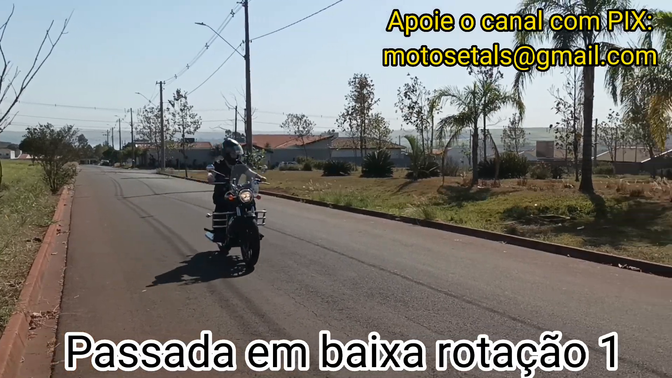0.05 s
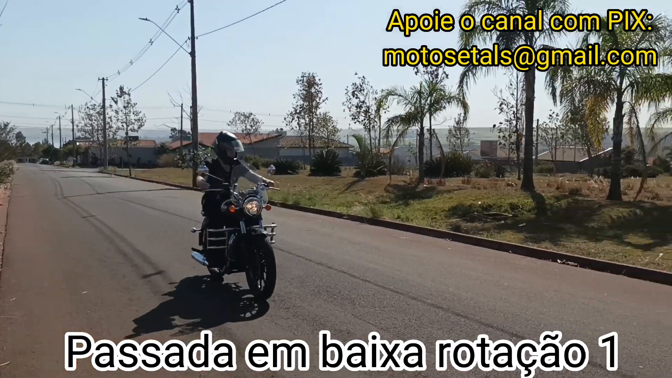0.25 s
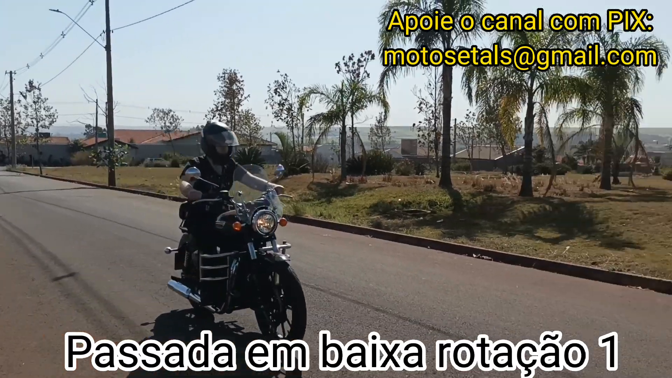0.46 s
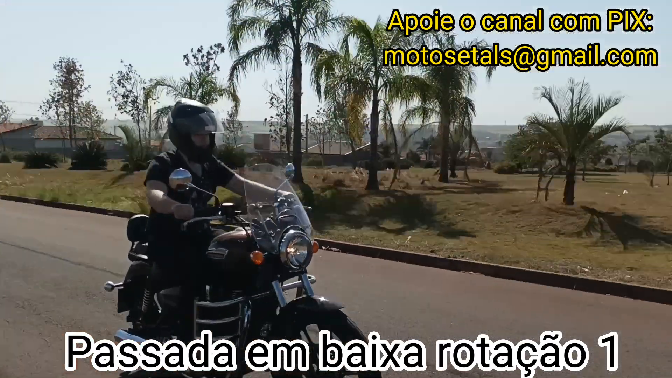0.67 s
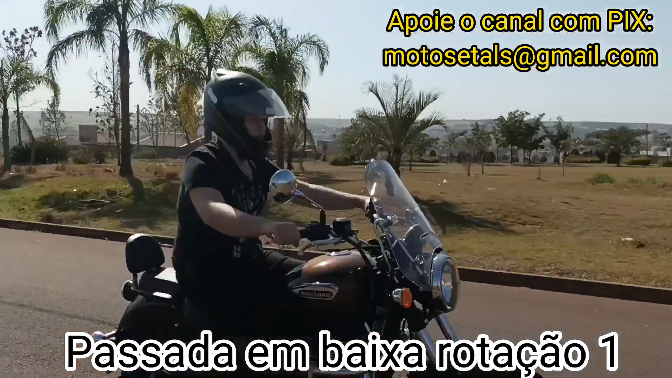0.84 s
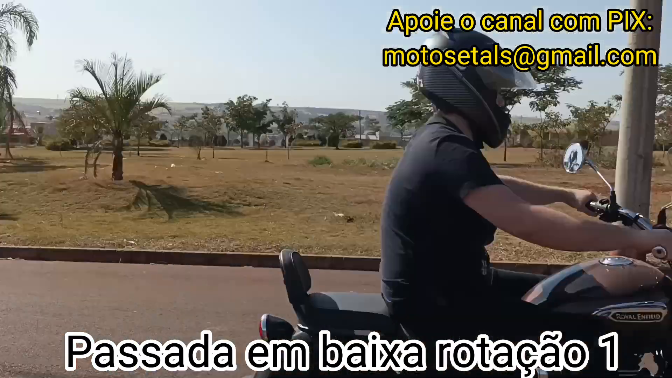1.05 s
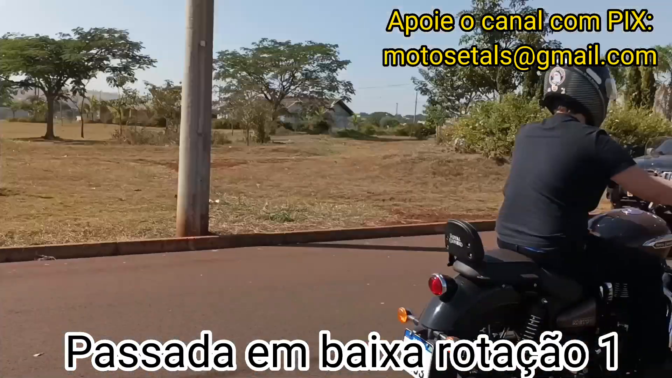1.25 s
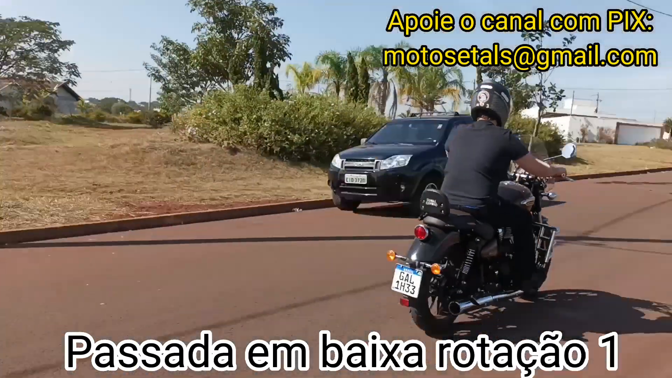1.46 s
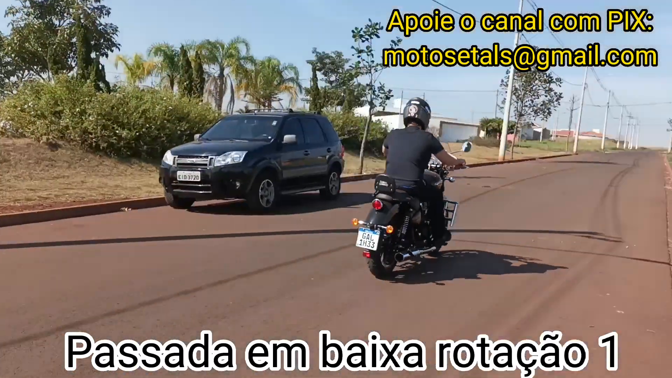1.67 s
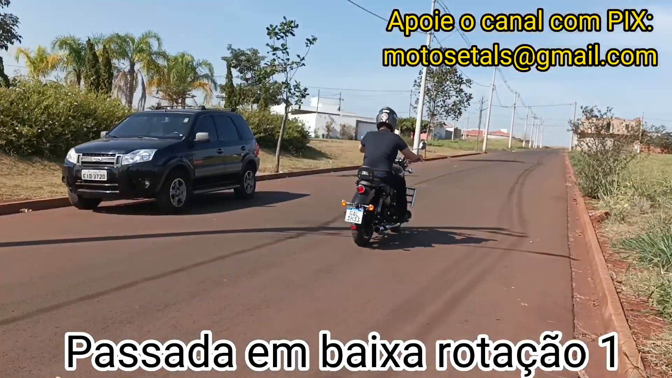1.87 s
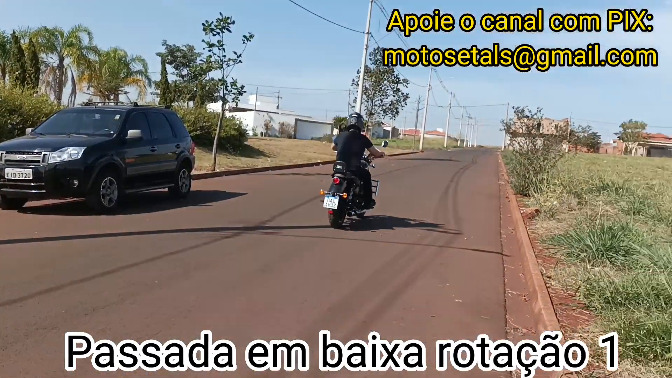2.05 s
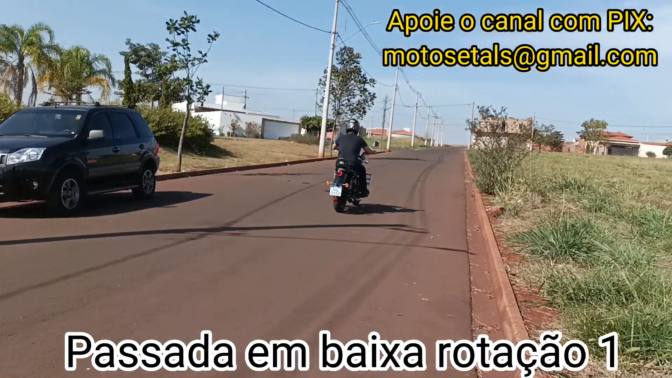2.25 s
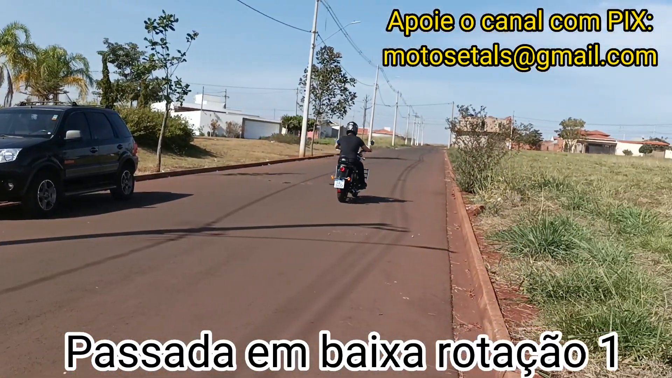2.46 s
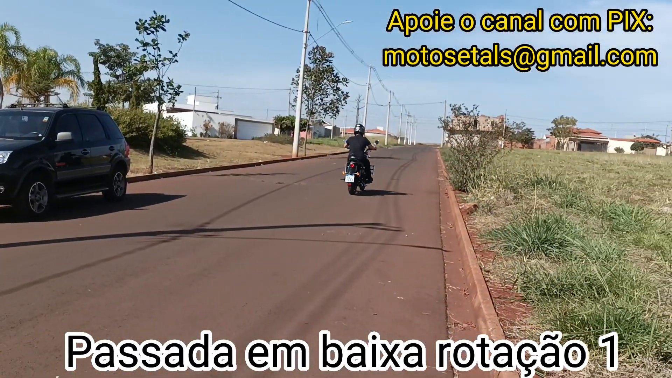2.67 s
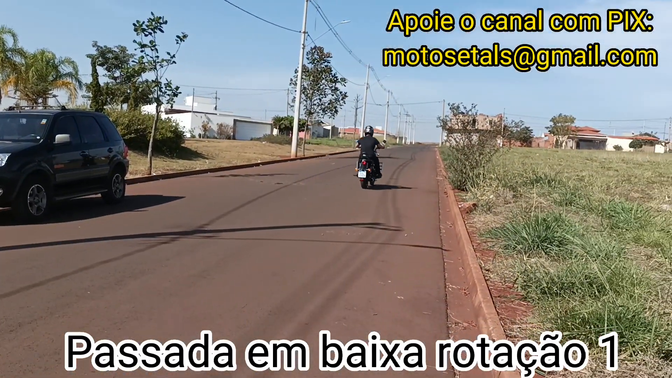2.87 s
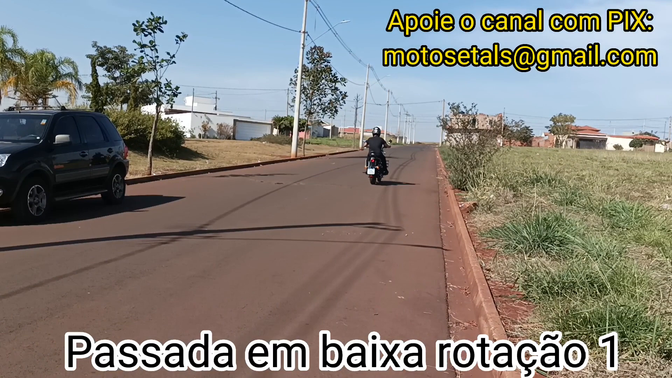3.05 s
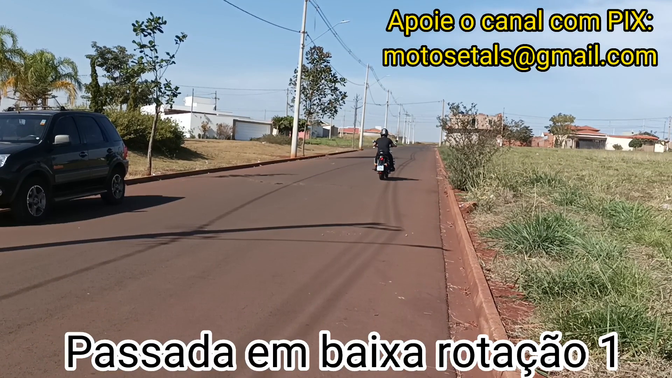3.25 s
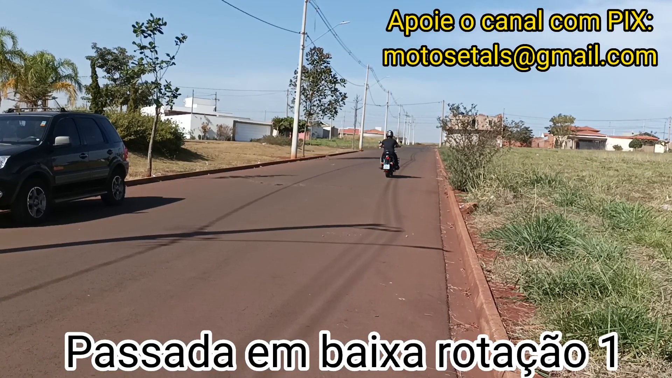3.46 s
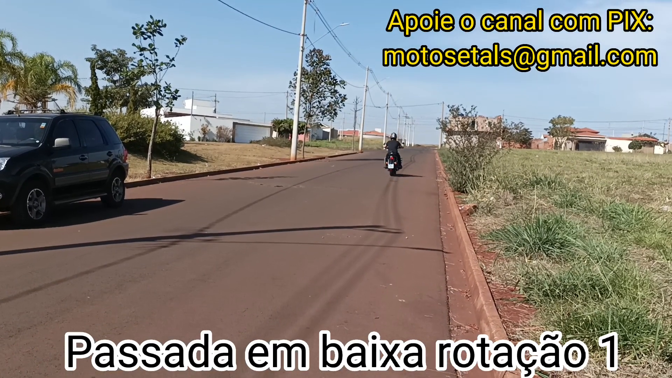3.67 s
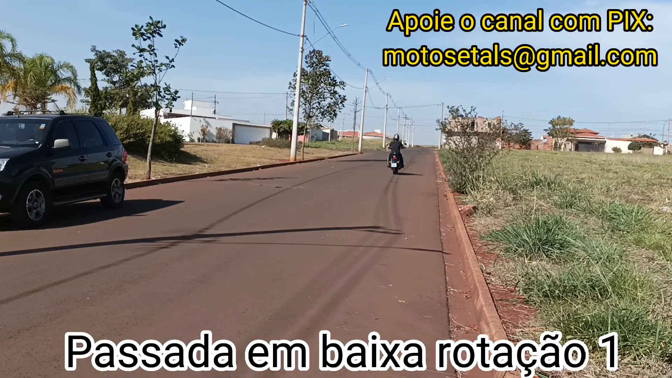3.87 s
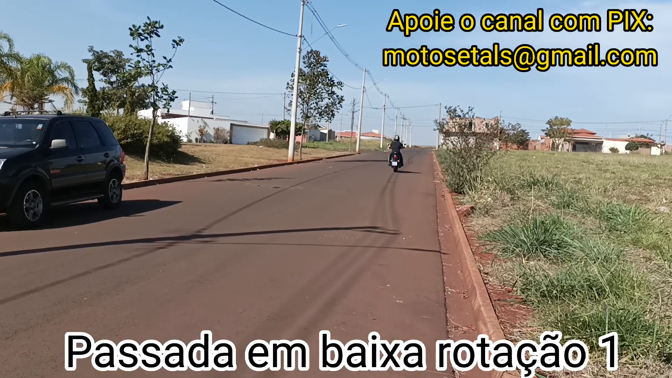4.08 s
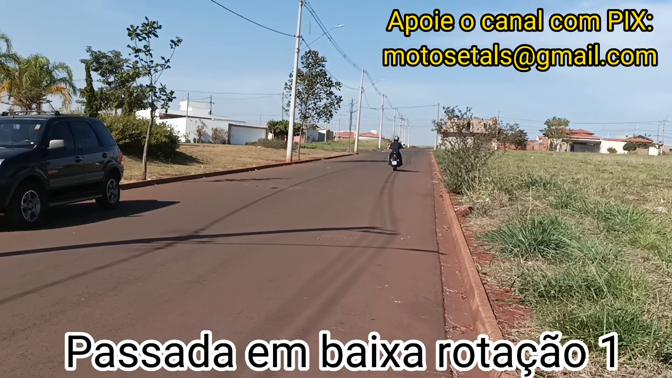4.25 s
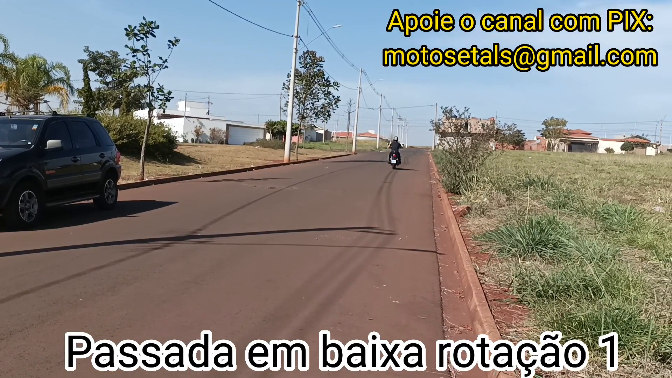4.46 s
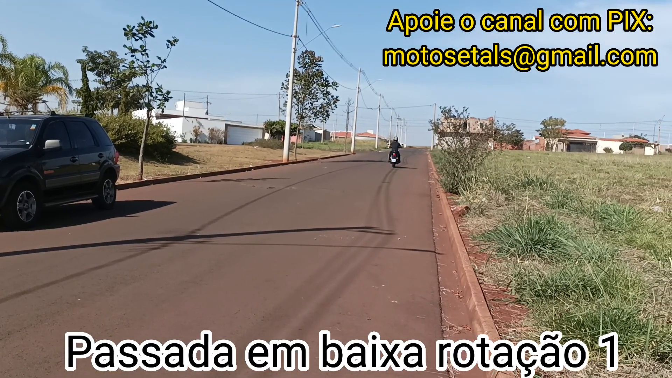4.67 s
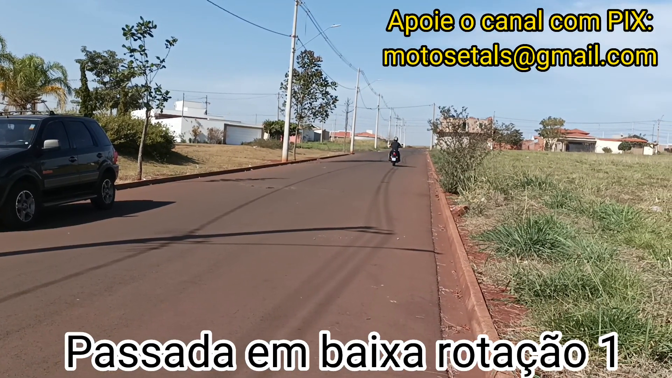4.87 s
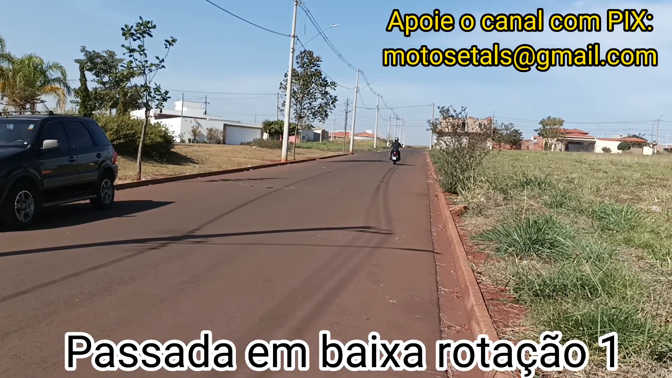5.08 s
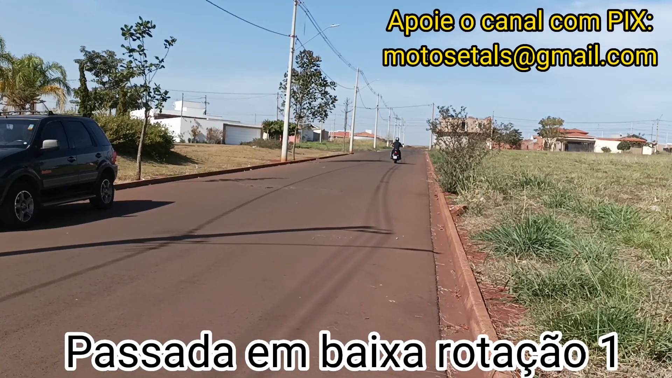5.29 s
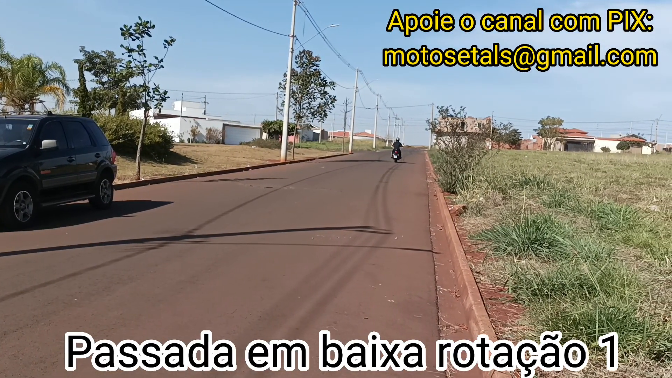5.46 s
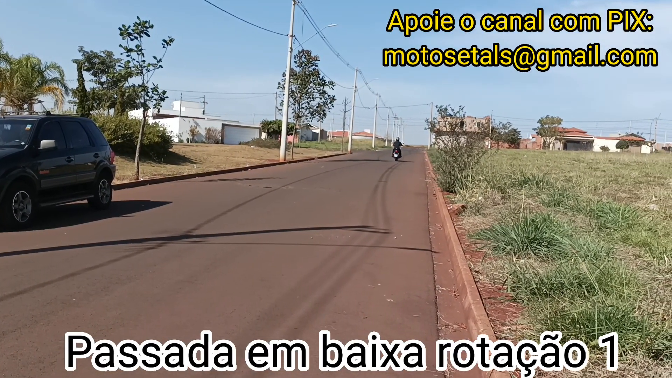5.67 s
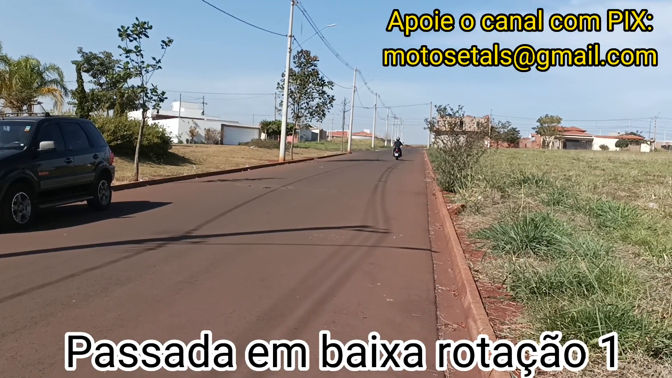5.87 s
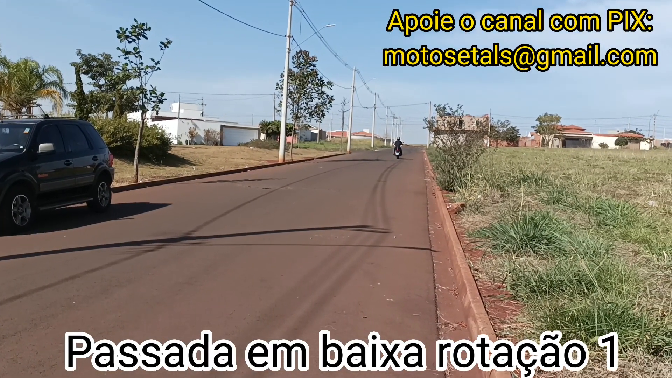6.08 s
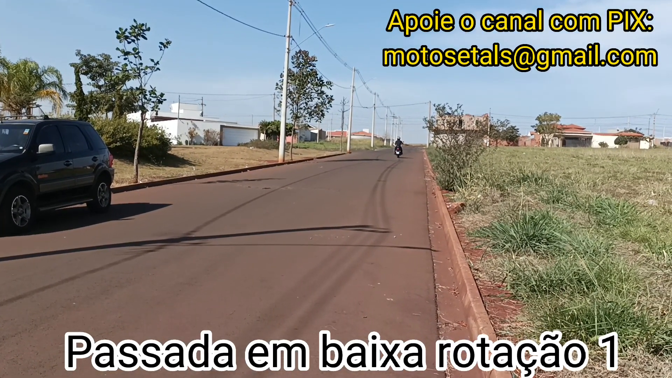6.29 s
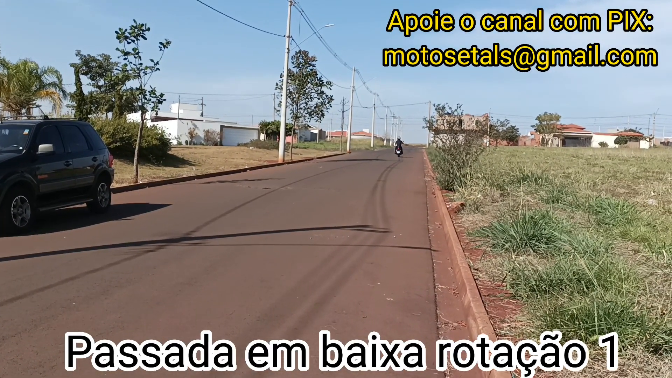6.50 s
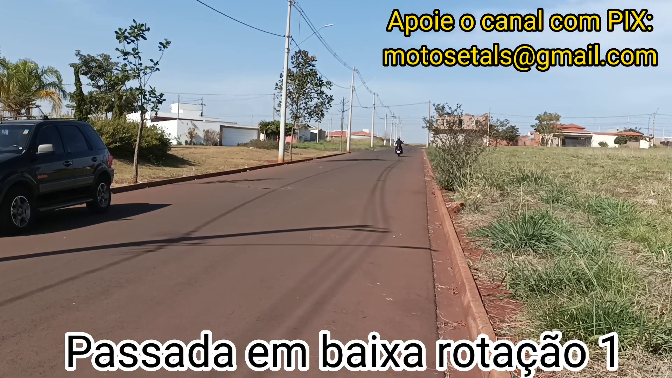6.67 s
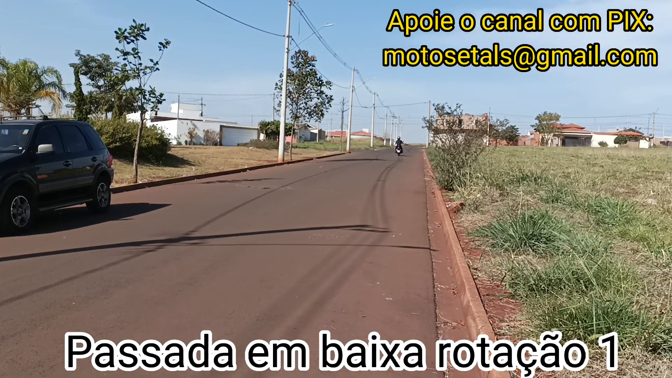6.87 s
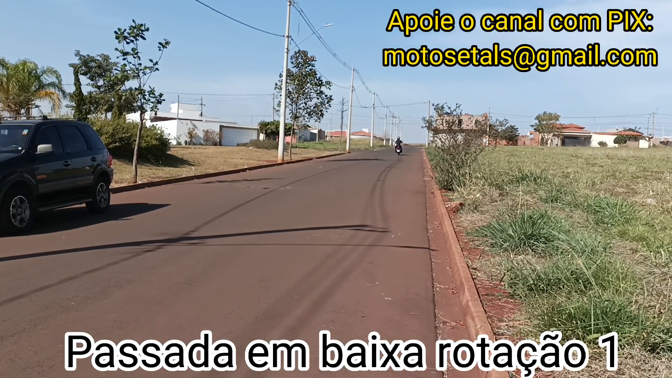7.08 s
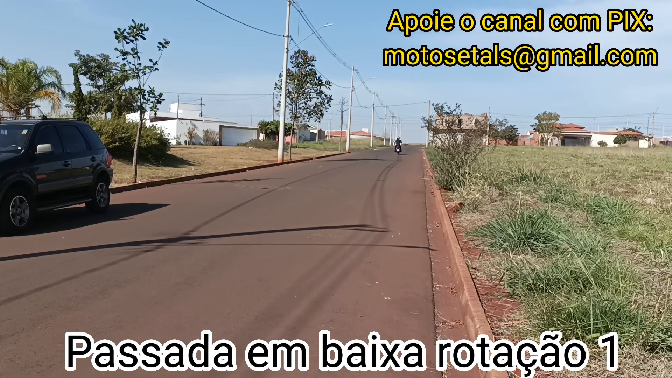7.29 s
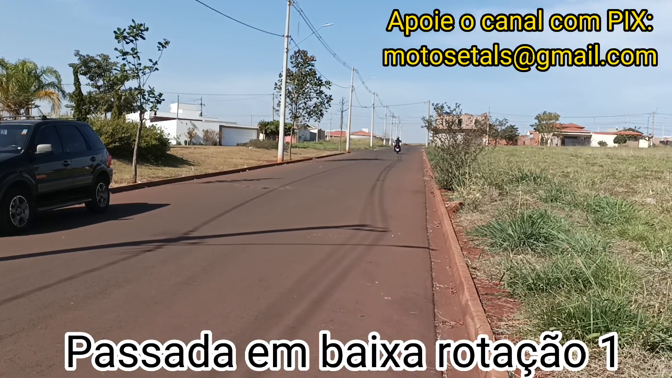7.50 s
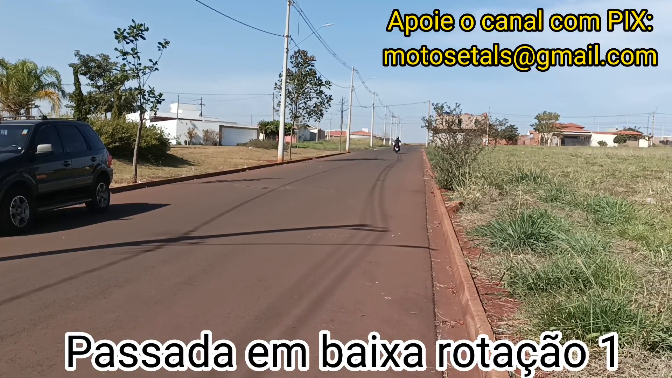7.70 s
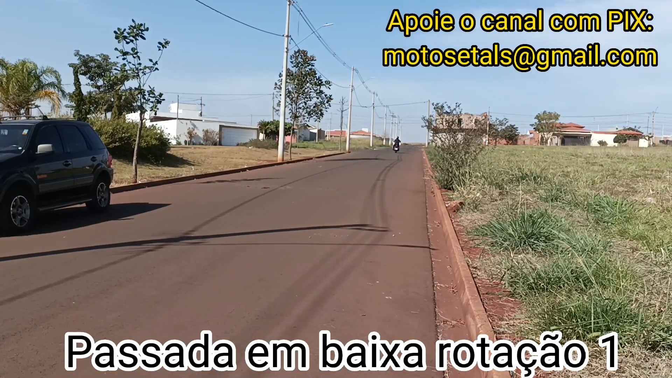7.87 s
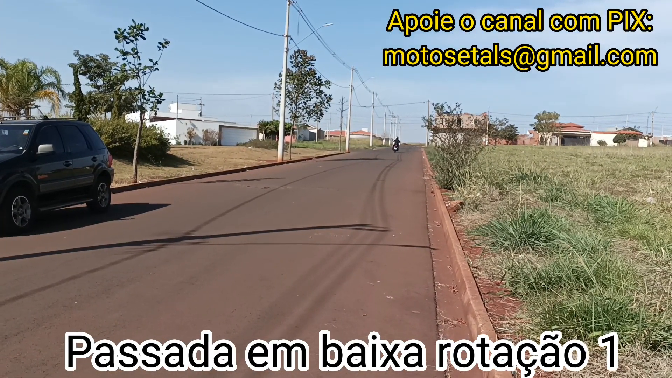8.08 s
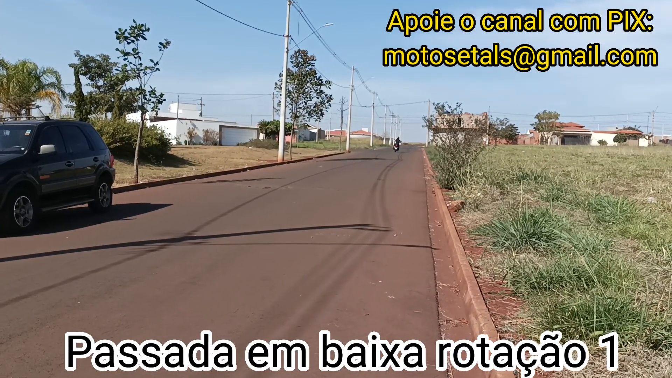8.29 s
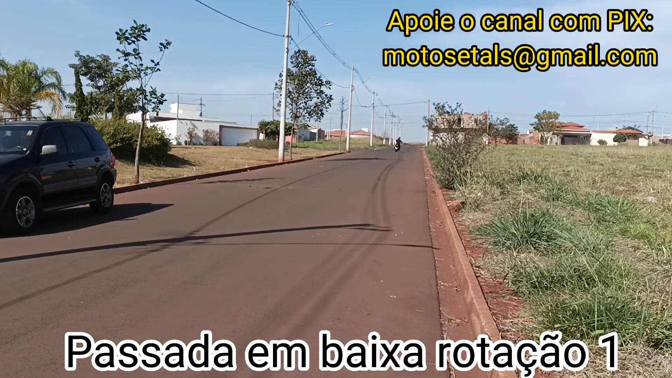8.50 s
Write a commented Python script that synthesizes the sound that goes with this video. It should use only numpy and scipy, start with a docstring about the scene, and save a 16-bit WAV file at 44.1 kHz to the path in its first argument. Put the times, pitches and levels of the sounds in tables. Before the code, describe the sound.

A motorcycle with a loud, barking exhaust cruises past, fades, falters briefly and chugs on into the distance, with faint chirps.

```python
"""A suburban street, a stereo microphone on the kerb. A big single-cylinder motorcycle comes up at low
revs, airbox honking, and passes close after a second, valve gear, chain and tyres rustling. Each firing
thumps the exhaust pipe with a bark and a spit of gas; a parked car and the house fronts throw it back.
From about three seconds small birds chirp now and then as the bike rides off. Near six seconds the
engine fades and falters, then returns abruptly and lugs on into the distance, slowing."""
import sys
import numpy as np
from scipy import signal
from scipy.fft import rfft, irfft, next_fast_len
from scipy.io import wavfile
from scipy.ndimage import map_coordinates

SR = 44100
rng = np.random.default_rng(int(sys.argv[2]) if len(sys.argv) > 2 else 0)


def dump_mix(stems):
    """Bounce the given channels to the path in sys.argv[1] as a 16-bit WAV at rate SR."""
    frames = np.atleast_2d(stems).T  # one column per channel
    limited = np.clip(frames, -1, 1)  # hard clip at full scale
    pcm = np.round(limited * 32767).astype(np.int16)
    wavfile.write(sys.argv[1], SR, pcm)


N = 376613
TIME = np.arange(N) / SR
ENGINE_PASS_S, PIPE_PASS_S = 1, 1.156  # engine, then pipe mouth, nearest the microphone
PASSING_S = 0.34  # time to ride a length equal to that nearest distance
FALTER_S, LUG_S = (5.63, 6.11), 6.28  # the engine falters, then returns lugging


def undb(db):
    """Decibels to gain."""
    return 10 ** (np.asarray(db) / 20)


def unit(x):
    """Scale to an rms of one."""
    return x / np.sqrt(np.mean(x ** 2))


def curves(table, at):
    """Every column of a table at the given times."""
    s, *columns = np.transpose(table)
    return [np.interp(at, s, c) for c in columns]


def gains(points, size):
    """A (freq_hz, level_db) spectrum as gains on the bins of an FFT."""
    hz, db = np.transpose(points)
    return undb(np.interp(np.log(np.fft.rfftfreq(size, 1 / SR) + 1), np.log(hz), db))


def colour(x, points):
    """Filter by a spectrum, without delay."""
    size = next_fast_len(N)
    return irfft(rfft(x, size) * gains(points, size), size)[..., :N]


def ring(x, points, size=8192):
    """Send x through a causal resonator of this colour and unit energy."""
    cepstrum = irfft(np.log(gains(points, size)))
    cepstrum[1:size // 2] *= 2
    cepstrum[size // 2 + 1:] = 0
    response = irfft(np.exp(rfft(cepstrum)))
    return signal.oaconvolve(x, response / np.linalg.norm(response))[:N]


def boost(x, at, hz, db, width):
    """A moving peak (or dip) of relative width, applied to short overlapping frames."""
    f, s, frames = signal.stft(x, SR, nperseg=2048, noverlap=1536)
    centre, gain = np.interp(s, at, hz), undb(np.interp(s, at, db) / 2)
    u = 1j * f[:, None] / centre
    frames = frames * (1 + u * width * gain + u ** 2) / (1 + u * width / gain + u ** 2)
    return signal.istft(frames, SR, nperseg=2048, noverlap=1536)[1][..., :N]


def walk(rate_hz):
    """Smooth random drift with a spread near one."""
    knots = rng.standard_normal(N // 100)
    return np.interp(TIME * rate_hz, np.arange(len(knots)), knots)


def distance(at, closest_s):
    """Distance from the microphone on a straight ride, in multiples of the nearest distance."""
    return np.hypot(1, (at - closest_s) / PASSING_S)


def pulses(times, db):
    """One impulse per firing, sized so that the train has this rms level."""
    train = np.zeros(N)
    samples = np.clip((times * SR).astype(int), 0, N - 1)
    train[samples] = undb(db) * np.sqrt(SR / curves(FIRING_RATE, times)[0])
    return train


def even_noise(count, size):
    """Rows of noise with equal strength at every frequency, repeating every few milliseconds."""
    cycle = irfft(np.exp(2j * np.pi * rng.random((count, 183))))
    return unit(cycle[:, np.arange(size) % cycle.shape[1]])


def puffs(times, db, rise_s, fall_s, alike, size=2048):
    """Turbulent gas swells and dies after each firing; the share `alike` recurs every cycle."""
    t = np.arange(size) / SR
    shape = (1 - np.exp(-t / rise_s)) ** 2 * np.exp(-t / fall_s)
    shape /= np.linalg.norm(shape)
    train = pulses(times, db)
    envelope = np.sqrt(np.abs(signal.oaconvolve(train ** 2, shape ** 2)[:N]))
    fresh = envelope * rng.standard_normal((2, N))
    patterns = signal.oaconvolve(train[None], shape * even_noise(8, size), axes=1)[:, :N]
    blend = np.array([walk(7) for _ in range(4)])  # the pattern drifts over a few firings
    recurring = (patterns.reshape(2, 4, N) * blend).sum(axis=1) / np.linalg.norm(blend, axis=0)
    return np.sqrt(1 - alike) * fresh + np.sqrt(alike) * recurring


def pings(times, db, tones, scatter_db, size=4096):
    """Decaying tones set off at these times; every blow shares its energy differently among them."""
    t = np.arange(size) / SR
    chance = rng.standard_normal((len(times), len(tones))).T
    out = 0
    for (hz, tone_db, t60_s), luck in zip(tones, chance):
        tone = np.sin(2 * np.pi * hz * t) * np.exp(-np.log(1000) * t / t60_s)
        blows = pulses(times, db + tone_db + scatter_db * luck)
        out = out + signal.oaconvolve(blows, tone / np.linalg.norm(tone))[:N]
    return out / np.sqrt(len(tones))


# stereo width at the microphone: freq_hz, side_minus_mid_db
STEREO_WIDTH = [(60, -33), (250, -23), (600, -17), (1200, -13.5), (2200, -4), (4500, -6.5), (9000, -4.5)]
def stereo(mid, side, wide_db):
    """Bass arrives alike in both channels, scattered treble does not."""
    return mid + np.array([[1], [-1]]) * undb(wide_db) * colour(side, STEREO_WIDTH)


# small birds off to the left: start_s, length_s, start_hz, end_hz, level_db
BIRD_CHIRPS = [(2.826, 0.038, 8000, 8500, -56), (4.855, .025, 8100, 7800, -62),
               (6.063, 0.02, 8260, 7800, -47.5), (6.703, 0.014, 9000, 8500, -73),
               (7.424, 0.023, 8100, 7060, -56.5), (7.673, 0.07, 6700, 4600, -64)]
def birds():
    """Thin chirps, mostly falling, with a slight quaver."""
    out = np.zeros(N)
    for start_s, length_s, start_hz, end_hz, db in BIRD_CHIRPS:
        progress = np.clip((TIME - start_s) / length_s, 0, 1)
        hz = (start_hz + (end_hz - start_hz) * progress) * (1 + 0.019 * walk(600))
        out += undb(db) * np.sin(np.pi * progress) * np.sin(2 * np.pi * np.cumsum(hz) / SR)
    return out * np.array([[1.3], [.6]])


def breeze():
    """Light wind at the kerb, a low rush that slowly swells and sinks."""
    spectrum = [(15, -12), (35, -27), (90, 11.5), (400, -5.5), (2000, -61)]
    mid, side = unit(colour(rng.standard_normal((2, N)), spectrum))
    return (mid + np.array([[.3], [-.3]]) * side) * undb(-43.5 + 2 * walk(1.92))


# echoes off the house fronts: delay_s, level_db
HOUSE_ECHOES = [(.0062, -8.5), (0.011, -12.5), (0.035, -20), (0.081, -21)]
def street(x, t60_s, tail_db, size=32768):
    """A few hard echoes, then a thin tail scattered by trees and houses."""
    t = np.arange(size) / SR
    tail = rng.standard_normal((2, size)) * np.exp(-np.log(1000) * t / t60_s) * (t > .008)
    tail *= undb(tail_db) * np.sqrt(2) / np.linalg.norm(tail)
    echoes = sum(undb(db) * np.interp(TIME - s, TIME, x, left=0) for s, db in HOUSE_ECHOES)
    mid, side = (signal.oaconvolve(x, h)[:N] for h in tail)
    reflected = stereo(mid + echoes, side, wide_db=4)
    return colour(reflected, [(300, -3.5), (800, -16.5), (2000, -7.5), (6000, -8)])


# echo off a car up the street: time_s, delay_s, level_db
PARKED_CAR_ECHO = [(1.0, 0.033, -36), (1.4, .028, -21.5), (1.8, 0.021, -27), (2.2, 0.011, -31),
                   (2.7, 0.00705, -20), (3.2, 0.0053, -19), (4.2, .005, -30)]
def parked_car(x):
    """The side of a parked car throws the exhaust back, ever earlier as the bike draws past it."""
    delay_s, db = curves(PARKED_CAR_ECHO, TIME)
    return undb(db) * np.interp(TIME - delay_s, TIME, x, left=0)


def road(x, bounce, unity_hz, closest_s=1.2, passing_s=0.79, longest_s=0.0014):
    """A bounce off the asphalt, latest when the bike is closest: a shallow comb sinks and rises."""
    delay_s = longest_s / np.hypot(1, (TIME - closest_s) / passing_s)
    combed = x + bounce * np.interp(TIME - delay_s, TIME, x)
    return combed / np.abs(1 + bounce * np.exp(2j * np.pi * unity_hz * delay_s))


def churn():
    """Gas churns in the silencer between firings, well below the thump."""
    spectrum = [(40, 1.5), (90, -6), (200, 4), (380, 13), (600, -19), (2000, -59)]
    below_db = np.where(TIME > LUG_S, 30, 24)
    return unit(colour(rng.standard_normal(N), spectrum)) * undb(thump_level(TIME) - below_db)


# three gear meshes heard from the kerb: time_s, slow_db, middle_db, fast_db
WHINE_LEVEL = [(0, -65, -47, -75), (.5, -61, -60, -58), (1.0, -43, -39, -57), (1.6, -73, -84, -82),
               (4.2, -50.5, -66, -85), (5.6, -59, -55, -83), (6.6, -56, -60, -66), (7.3, -54, -53.5, -66),
               (7.8, -68, -79, -81)]
TEETH_PER_FIRING = (70.5, 79.7, 192)
def gear_whine(phase):
    """Meshing gears: faint tones locked to the revs, smeared by the crank's surge at every firing."""
    surge = 1 + 0.014 * np.sin(2 * np.pi * phase) + 0.0145 * walk(200)
    cycles = np.cumsum(curves(FIRING_RATE, TIME)[0] * surge) / SR
    return sum(np.sin(2 * np.pi * teeth * cycles) * undb(db + 2 * walk(40))
               for teeth, db in zip(TEETH_PER_FIRING, curves(WHINE_LEVEL, TIME)))


# hiss from the front of the bike: time_s, level_db
SIZZLE_LEVEL = [(0, -66.5), (.45, -60.5), (.9, -62), (1.3, -59), (2, -68), (3, -90)]
# its colour: freq_hz, level_db
SIZZLE_COLOUR = [(5500, -39), (6350, -11), (6600, -5), (6760, 5), (6900, 2), (7060, -9), (7350, -1),
                 (7900, -5.5), (8500, -19), (9500, -53)]
def sizzle():
    """A narrow, flickering hiss runs ahead of the bike."""
    hiss = unit(colour(rng.standard_normal((2, N)), SIZZLE_COLOUR))
    return stereo(*hiss, wide_db=5) * undb(curves(SIZZLE_LEVEL, TIME)[0] + 3.6 * walk(120))


# the running gear close to the microphone and far off: freq_hz, level_db
NEAR_RUSTLE = [(300, -5), (500, 5), (700, -19), (1000, 9.5), (1300, 1), (1650, -6), (1950, -6),
               (2290, -10.5), (2800, -16.5), (4200, -17), (5600, -25), (7200, -20), (9000, -27.5),
               (12000, -32), (16000, -71)]
FAR_RUSTLE = [(300, -4.5), (520, -7.5), (820, 2), (1050, -3), (1300, -9.5), (1750, -10.5), (2100, -18),
              (2350, -16), (2580, -19.5), (2950, -11), (3400, -15.5), (3850, -13), (4130, -16), (4450, -17),
              (5200, -23), (5480, -22.5), (5800, -22.5), (6800, -21), (8000, -25), (11200, -31),
              (16000, -85)]
# the far rustle's two bands: time_s, low_db, high_db
FAR_RUSTLE_LEVEL = [(0, -43, -67), (2.6, -46, -61), (4.0, -44.5, -61), (5.8, -44.5, -61), (7.5, -48, -71),
                    (8.54, -50.5, -72)]
CLATTER_FOCUS = 1.88  # clatter beams sideways, so it falls with this power of the distance
def rustle(phase, near):
    """Valve gear, chain and tyres: a hiss that ticks with the cam, bright close by and dull far off."""
    far_low_db, far_high_db = curves(FAR_RUSTLE_LEVEL, TIME)
    noise = rng.standard_normal((2, 2, N))
    ticking = undb(1.1 * np.cos(4 * np.pi * phase + 1) + 2.36 * walk(180) + 1.05 * walk(9))
    clatter, hiss = undb(-41.5) * near ** CLATTER_FOCUS, undb(-47.5) * near
    out = 0
    for band, near_gain, far_db in (("low", clatter, far_low_db), ("high", hiss, far_high_db)):
        close, far = signal.sosfilt(signal.butter(4, 2200, band, fs=SR, output="sos"), noise)
        out += near_gain * unit(colour(close, NEAR_RUSTLE))
        out += undb(far_db) * unit(colour(far, FAR_RUSTLE))
    return stereo(*(out * ticking), wide_db=4.5)


# valve knocks in one engine cycle: cycle_fraction, level_db
VALVE_KNOCKS = [(0.178, -19), (.44, -12), (.6, -12.5), (.7, -4.5), (0.879, -4.5)]
# modes of the cylinder head: pitch_hz, level_db, t60_s
HEAD_MODES = [(835, -8.5, 0.071), (1108, -5, 0.057), (1410, 0, 0.13), (1545, -7, 0.08), (1655, -4, 0.098),
              (1900, -9.5, 0.081), (2306, -7, 0.096), (2460, -10, .05), (3500, -12.5, .04),
              (4030, -13, .08)]
def valves(times, near, level_db=-38):
    """Valves open and seat at set places in the cycle and ring the head; heard only close by."""
    place, db = np.transpose(VALVE_KNOCKS)
    blows = (times[:, None] + place / curves(FIRING_RATE, times)[0][:, None]).ravel()
    blows += .0004 * rng.standard_normal(len(blows))
    blow_db = level_db + np.tile(db, len(times))
    mid, side = (pings(blows, blow_db, HEAD_MODES, scatter_db=5.5) for _ in range(2))
    return stereo(mid, side, wide_db=3.5) * near ** CLATTER_FOCUS


# the airbox while it faces the microphone: time_s, level_db
HONK_LEVEL = [(0, -42), (.45, -38), (.8, -63), (1.1, -58), (1.4, -66)]
# its colour: freq_hz, level_db
HONK_COLOUR = [(200, -20), (400, 1), (480, -1), (560, -3), (660, 6), (800, 8), (1000, -9), (1700, -29),
               (4000, -54)]
def intake_honk(times):
    """Each cycle's gulp of air rings the forward-facing airbox on the approach."""
    times = times[times < HONK_LEVEL[-1][0]]
    return ring(pulses(times + 0.00174, curves(HONK_LEVEL, times)[0]), HONK_COLOUR)


# air drawn late in each cycle, loudest when lugging: time_s, level_db
GULP_LEVEL = [(3.5, -60), (4.9, -56), (5.6, -52), (6.1, -58), (6.35, -50), (6.7, -49), (7.1, -54),
              (7.6, -59), (8.54, -51)]
# its colour: freq_hz, level_db
GULP_COLOUR = [(200, -37), (500, -25), (680, -10.5), (780, 4), (860, 2), (1000, -20), (1300, -17),
               (3000, -53), (8000, -92)]
def gulps(times, cycle_fraction=.73):
    """The intake stroke sets the airbox ringing between two thumps."""
    times = times + cycle_fraction / curves(FIRING_RATE, times)[0]
    times = times[times < TIME[-1]]
    db = curves(GULP_LEVEL, times)[0] + 1.8 * rng.standard_normal(len(times))
    return ring(pulses(times, db), GULP_COLOUR)


# the jet at the pipe's mouth: time_s, level_db
FIZZ_LEVEL = [(0, -80), (.9, -78), (1.3, -66), (1.9, -62.5), (2.2, -70.5), (2.8, -72), (3.15, -77),
              (3.42, -68), (3.68, -80), (4.3, -73), (4.78, -67.5), (4.96, -76), (5.15, -66.5), (5.33, -89),
              (5.9, -90)]
# its colour: freq_hz, level_db
FIZZ_COLOUR = [(3000, -29), (6000, -5), (8000, 1), (10000, 5), (11800, 4.5), (13500, -5), (15200, -5),
               (16500, -19)]
def fizz(burns, steepness=3.3, scatter_db=1.5):
    """Until the engine lugs, fine hiss leaves the pipe with each blow; it flares on hard burns."""
    times, thump_db = burns[burns[:, 0] < LUG_S].T[:2]
    db = curves(FIZZ_LEVEL, times)[0] + steepness * (thump_db - thump_level(times))
    db -= scatter_db * rng.standard_normal(len(times))
    jet = puffs(times - .0008, db, rise_s=.0012, fall_s=0.001, alike=.2)
    return stereo(*colour(jet, FIZZ_COLOUR), wide_db=7)


# two narrow resonances of the pipe: freq_hz, level_db
PIPE_RESONANCES = [(450, -48.5), (570, -11.5), (603, -4), (640, -10.5), (675, -25), (707, -5.5),
                   (750, -12.5), (900, -52.5), (3000, -83)]
def pipe_ring(times, level_db=-43, loudest_s=4.77, half_width_s=1.64):
    """Each firing leaves a hollow ring in the pipe, swelling as the bike rides up the street."""
    times = times[times < LUG_S]
    swell = 1 / (1 + ((times - loudest_s) / half_width_s) ** 4)
    db = level_db + 20 * np.log10(swell) + curves(ENGINE_FADE, times)[0]
    return ring(pulses(times + 0.00201, db), PIPE_RESONANCES)


# burns that stand out from their neighbours: start_s, extra_thump_db, extra_bark_db, extra_spit_db
HARD_BURNS = [(1.09, 1, 3, 4), (1.185, 1, 3, 4.5), (1.329, 0.5, 3, 4), (1.764, -0.5, -1, 3.5),
              (1.812, -0.5, 5, -1), (1.861, -0.5, 0.5, 0), (1.909, 0, 1, 2.5), (2.199, 0.5, 3.5, -2.5),
              (2.392, -0.5, 5.5, -2), (2.439, 1.5, 6, 4.5), (2.487, 0, 3.5, 3), (2.679, 2, 8, 4),
              (2.963, 0.5, 6, -1), (3.155, 0.5, 5.5, 3), (3.439, 1.1, 3.5, -9), (3.488, -0.5, -4, 7),
              (3.628, 0.5, 1.5, -1), (3.676, 0.5, 2.5, -10), (3.724, 0.5, 2, 0), (3.771, 1, 1.5, -10),
              (3.865, 0, 2.5, -5), (3.912, 0.5, 4.5, -11), (3.959, 2, 4.5, -5), (4.1, 1.5, 7.5, 1),
              (4.287, 1, 5, -5), (4.427, 0, 3.5, -1), (4.66, 1.1, 1.5, 0), (4.707, -0.5, 2, 0),
              (4.939, 1.5, 6, 3.5)]
# their pop: freq_hz, level_db
POP_COLOUR = [(20, -3), (60, 6), (200, 0.5), (600, 2.5), (1300, -20), (3000, -30), (12000, -44)]
def pops():
    """The gas that a hard burn adds bursts out at once, as a broad pop."""
    times, extra_db = np.transpose(HARD_BURNS)[:2]
    excess_db = 20 * np.log10(np.maximum(undb(extra_db) - 1, .001))
    return -ring(pulses(times + 0.001135, thump_level(times) + excess_db - 2.5), POP_COLOUR)


# a moving peak or dip that colours the bark as the bike rides by: time_s, freq_hz, boost_db
BARK_SWEEP = [(0, 1330, -11), (.8, 910, -10), (1.3, 850, -14), (1.701, 800, 6), (2.3, 1020, 4),
              (3.0, 950, 0), (3.7, 1530, 3), (4.6, 1800, 6.5), (5.5, 1790, 5.5), (5.899, 1500, -7),
              (6.3, 775, 5), (6.9, 826, 0), (7.2, 1400, 3), (7.5, 1800, 8), (8.0, 1800, -0.5),
              (8.54, 1700, 3)]
# a bright peak and a hollow in the exhaust's rasp: time_s, peak_hz, peak_db, hollow_hz, hollow_db
RASP_SWEEP = [(.8, 1310, 7, 2810, 7), (1.1, 1460, 8.5, 2800, 2), (1.35, 2100, 8, 2850, -4),
              (1.57, 2170, 18.5, 2930, -20), (1.72, 3540, 8, 2690, -32), (1.9, 4670, 11.5, 2750, -23),
              (2.15, 5600, 11, 2900, -8), (2.6, 4500, 0.5, 2760, 0.5), (4.398, 4100, 1.5, 2360, -4.5),
              (8.54, 3780, 4.5, 2670, -13.5)]
def passing_sweep(gas):
    """As the bike passes, a bright peak climbs through the exhaust's rasp, with a hollow beside it."""
    s, peak_hz, peak_db, hollow_hz, hollow_db = np.transpose(RASP_SWEEP)
    gas = boost(gas, *np.transpose(BARK_SWEEP), width=0.38)
    gas = boost(gas, s, peak_hz, peak_db, width=0.34)
    return boost(gas, s, hollow_hz, hollow_db, width=0.11)


# bark and spit from the kerb, before fade and flare: time_s, level_db
BARK_LEVEL = [(0, -39), (1.4, -40), (2.3, -37), (3.3, -35.5), (3.8, -32.5), (4.3, -32), (4.9, -36.5),
              (5.55, -41), (6.4, -37.5), (7.3, -41), (8.54, -44.5)]
SPIT_LEVEL = [(.7, -56), (1.2, -50.5), (1.5, -44.5), (1.87, -43), (2.3, -51.5), (3.9, -56), (4.5, -48.5),
              (5.05, -48), (5.6, -53.5), (6.55, -54.5), (7.1, -59), (7.45, -56), (7.75, -49), (8.1, -48),
              (8.54, -50)]
def gas_levels(at, steepness=2.92, peak_db=13.5, half_width_s=0.25):
    """Bark and spit (dB) die as the engine fades; the bark flares as the pipe's mouth sweeps past."""
    fade_db = steepness * curves(ENGINE_FADE, at)[0]
    flare_db = peak_db * np.exp(-((at - PIPE_PASS_S) / half_width_s) ** 2)
    return curves(BARK_LEVEL, at)[0] + fade_db + flare_db, curves(SPIT_LEVEL, at)[0] + fade_db


# the steep front of a blow, cruising and lugging: freq_hz, level_db
CRUISE_CRACK = [(100, -23.5), (400, 0.5), (520, -4.5), (620, 7.5), (900, 8), (1150, 5), (1450, -4),
                (1850, -13.5), (2250, -18), (3000, -11.5), (5000, -41), (12000, -44), (16000, -67)]
LUG_CRACK = [(100, -32), (400, 3.5), (520, -12), (640, -7), (780, 6), (930, 5.5), (1100, 7.5), (1450, -5),
             (1850, -17), (2250, -14), (3000, -14.5), (5000, -41), (12000, -49), (16000, -73)]
# gas leaving the pipe, its low bark and bright spit: freq_hz, level_db
BARK_COLOUR = [(60, -4), (300, -8), (520, -28), (600, 6), (655, -6.5), (715, 0.5), (790, -3.5), (860, 5.5),
               (960, -2), (1100, 4.5), (1400, -16.5), (1800, -5), (2200, -24), (4000, -53), (12000, -78)]
CRUISE_SPIT = [(1200, -0.5), (2300, 3.5), (3000, 10.5), (3400, 5.5), (3850, 1.5), (4120, 2.5), (4420, 0.5),
               (5150, -11), (5480, -8.5), (5800, -11.5), (6700, -10), (7500, -8.5), (9500, -18.5),
               (12000, -23.5), (15500, -48)]
LUG_SPIT = [(1200, 10), (2300, 3), (3000, 11.5), (3450, 2.5), (3850, 0), (4150, -3), (4480, -5),
            (4850, -13), (7000, -13.5), (9000, -27), (11500, -21), (15500, -75)]
# a bright, metallic-sounding ring after each firing: pitch_hz, level_db, t60_s
ZING_TONES = [(1919, 2.5, 0.037), (2450, 0, 0.041), (2982, 5, 0.029), (3804, -6, 0.042), (4420, -13, 0.038),
              (5600, -24, 0.011)]
def exhaust(burns, crack_colour, spit_colour, delay_s, spit_fall_s, bark_fall_s,
            shock_db, snap_db, bark_db, spit_db, zing_db, snap_scatter_db):
    """Each blow's front cracks at the pipe's mouth; snaps, rough gas and a bright ring follow."""
    times, _, burn_bark_db, burn_spit_db = burns.T
    jitter, front_luck, stray_luck, lag = rng.standard_normal((len(times), 4)).T
    gas_s = times + delay_s
    front_s = gas_s + .0005 + .0001 * jitter
    stray_s = front_s + .0002 + .0006 * np.abs(lag)
    shock = -pulses(front_s, burn_bark_db + shock_db)
    snap = pulses(stray_s, burn_spit_db + snap_db + snap_scatter_db * stray_luck)
    snap -= pulses(front_s, burn_spit_db + snap_db + snap_scatter_db * front_luck)
    bark = puffs(gas_s, burn_bark_db + bark_db, rise_s=0.0011, fall_s=bark_fall_s, alike=0.75)
    spit = puffs(gas_s - .0005, burn_spit_db + spit_db, rise_s=0.0023, fall_s=spit_fall_s, alike=0.78)
    zing = pings(front_s, burn_spit_db + zing_db, ZING_TONES, scatter_db=5)
    mid = ring(shock, crack_colour) + ring(bark[0], BARK_COLOUR) + ring(snap + spit[0], spit_colour)
    side = ring(bark[1], BARK_COLOUR) + ring(spit[1], spit_colour)
    return stereo(mid + zing, side, wide_db=0)


# near six seconds the engine fades, then returns abruptly: time_s, level_db
ENGINE_FADE = [(5.45, -3.5), (5.8, -4.5), (6.05, -8.5), (6.26, -12.5), (6.3, -0.5)]
def thump_level(at, base_db=-12.5, loss_db_per_decade=9.5, sag_db_per_s=3):
    """The thump (dB) weakens with distance, fades briefly, and sags as the engine lugs."""
    loss_db = loss_db_per_decade * np.log10(distance(at, PIPE_PASS_S))
    lug_db = (at > LUG_S) * (-0.6 - sag_db_per_s * (at - LUG_S))
    return base_db - loss_db + curves(ENGINE_FADE, at)[0] + lug_db


# one thump from in front, from behind, faltering and lugging: freq_hz, level_db
FRONT_PIPE = [(30, -52), (63, -31), (76, -9.5), (92, -1.5), (132, -12), (183, 2.5), (228, -7), (280, -4),
              (340, -9), (410, -12), (490, -22), (560, -33.5), (850, -42), (2500, -90)]
REAR_PIPE = [(30, -44.5), (63, -38), (76, -5), (92, 2), (135, -3.5), (180, 3.5), (215, 1), (245, -1),
             (290, 0.5), (340, -7), (410, -8), (480, -23.5), (560, -28.5), (850, -42), (2500, -58),
             (7000, -100)]
FALTER_PIPE = [(30, -44), (58, -51), (80, 3.5), (110, -0.5), (140, -3), (185, -10.5), (260, -3),
               (310, -17.5), (400, -12), (520, -35), (850, -47), (2500, -81)]
LUG_PIPE = [(30, -29), (48, -37), (62, -5.5), (80, -2.5), (110, -6), (138, 0.5), (176, -13), (205, -13),
            (250, -8.5), (310, -16.5), (420, -19), (520, -38.5), (900, -25.5), (2500, -101)]
# the thump's upper edge dips at the pass, then sinks as the revs fall: time_s, freq_hz, boost_db
THUMP_EDGE = [(0, 470, -2), (.4, 480, 0), (.7, 450, 5.5), (.9, 460, 0.5), (1.15, 450, -10),
              (1.5, 413, -4.5), (2.2, 502, 3), (5.9, 342, -2), (6.25, 330, -14), (6.4, 318, 4.5),
              (6.9, 303, 1), (7.4, 295, -5), (8.3, 270, -7.5)]
def thumps(burns, cruise_db, falter_db, lug_db, blow_s, kickback, lug_rate_hz=19.6):
    """Each blow-down rings the pipe; when lugging the flow lasts longer and its end kicks back."""
    times, db = burns.T[:2]
    lug = times > LUG_S
    blows = pulses(times[~lug], db[~lug])
    faltering = np.interp(TIME, FALTER_S, (0, 1))
    cruising = blows * (1 - faltering) * undb(cruise_db)
    behind = np.interp(TIME, (.85, 1.4), (0, 1))  # the pipe's mouth comes round to the microphone
    # the valve stays open longer as the revs fall, so the hollow note sinks
    open_s = blow_s * (lug_rate_hz / curves(FIRING_RATE, times[lug])[0]) ** 0.28
    closing = kickback * pulses(times[lug] + open_s, db[lug] + lug_db)
    long_blows = closing - pulses(times[lug], db[lug] + lug_db)
    pipe = (ring(long_blows, LUG_PIPE)
            - ring(cruising * (1 - behind), FRONT_PIPE)
            - ring(cruising * behind, REAR_PIPE)
            - ring(blows * faltering * undb(falter_db), FALTER_PIPE))
    return boost(pipe, *np.transpose(THUMP_EDGE), width=0.14)


# firings as they reach the kerb, Doppler shift included: time_s, rate_hz
FIRING_RATE = [(0.0, 21.365), (0.7, 21.456), (1.0, 21.294), (1.3, 20.746), (1.7, 20.632), (2.3, 20.776),
               (3.8, 21.248), (4.6, 21.47), (5.3, 21.573), (5.9, 21.406), (6.1, 20.887), (6.25, 19.293),
               (6.45, 20.505), (6.7, 19.72), (7.0, 19.171), (7.5, 18.083), (8.0, 16.957), (8.54, 16.077)]
def firings(first_phase=.699, scatter_db=(.25, 1.2, 2.1)):
    """Engine phase in cycles, and burns (start_s, thump_db, bark_db, spit_db), no two alike."""
    phase = first_phase + np.cumsum(curves(FIRING_RATE, TIME)[0]) / SR
    times = TIME[1:][np.diff(np.floor(phase)) > 0]
    extra_db = rng.standard_normal((len(times), 3)) * scatter_db
    extra_db[times > LUG_S] *= .5  # lugging burns are more even
    for start_s, *db in HARD_BURNS:
        extra_db[np.argmin(np.abs(times - start_s))] = db
    levels_db = np.column_stack([thump_level(times), *gas_levels(times)]) + extra_db
    return phase, np.column_stack([times, levels_db])


def scene():
    """From the kerb: the bike cruises by, falters a moment, then lugs away; the street answers."""
    phase, burns = firings()
    times = burns[:, 0]
    lugging = times > LUG_S
    near = 1 / distance(TIME, ENGINE_PASS_S)
    thump = thumps(burns, cruise_db=1.36, falter_db=2, lug_db=-8.5, blow_s=0.00542, kickback=1.47)
    gas = exhaust(burns[~lugging], CRUISE_CRACK, CRUISE_SPIT,
                  delay_s=0.00027, spit_fall_s=0.0015, bark_fall_s=0.0017,
                  shock_db=-1, snap_db=-2.5, bark_db=-4.5, spit_db=4, zing_db=-2, snap_scatter_db=5)
    gas += exhaust(burns[lugging], LUG_CRACK, LUG_SPIT,
                   delay_s=0.002497, spit_fall_s=0.003, bark_fall_s=0.0032,
                   shock_db=-5.5, snap_db=-14, bark_db=-5, spit_db=-1, zing_db=-6.5, snap_scatter_db=3)
    gas = passing_sweep(gas)
    gas_mid = gas.mean(axis=0)
    echoes = street(gas_mid * undb(-4 * near), t60_s=1, tail_db=-5) + parked_car(thump + gas_mid)
    pipe = road(thump, bounce=0.1, unity_hz=184) + gas + fizz(burns) + pops() + pipe_ring(times)
    airbox = gulps(times) + intake_honk(times)
    machine = rustle(phase, near) + valves(times, near) + sizzle() + gear_whine(phase)
    left, right = echoes + pipe + airbox + machine + churn() + breeze()
    # the left channel leads until the microphone swings round after the bike
    lag_ms = np.interp(TIME, (0.9, 1.18), (-0.15, 0.022))
    left = map_coordinates(left, [np.arange(N) - lag_ms * SR / 1000], order=3, mode="nearest")
    return np.array([left, right]) + birds()


# the microphone's two ports: freq_hz, left_minus_right_db
MIC_PORTS = [(100, 0.4), (300, 0), (550, 2.1), (1100, 0.8), (2200, -0.3), (4500, -0.5), (8000, -9.5),
             (13000, 15.5)]
def record(dry, top_hz=15700):
    """Each port colours its channel; the highest peaks are softly rounded and the recorder cuts the top."""
    channels = np.array([colour(x, [(hz, sign * db / 2) for hz, db in MIC_PORTS])
                         for x, sign in zip(dry, (1, -1))])
    rounded = channels / (1 + channels ** 8) ** (1 / 8)
    return signal.sosfilt(signal.ellip(8, .2, 80, top_hz, fs=SR, output="sos"), rounded)


dry = scene()
out = record(dry)
dump_mix(out)
```